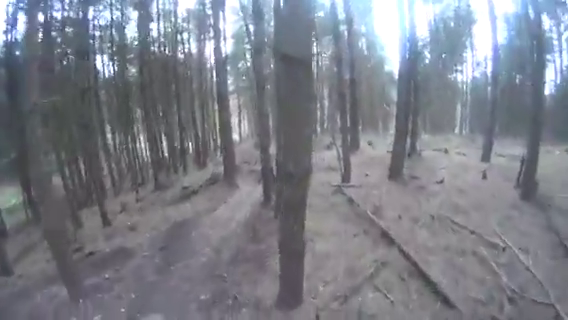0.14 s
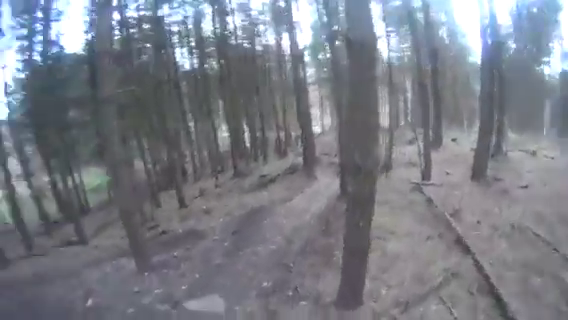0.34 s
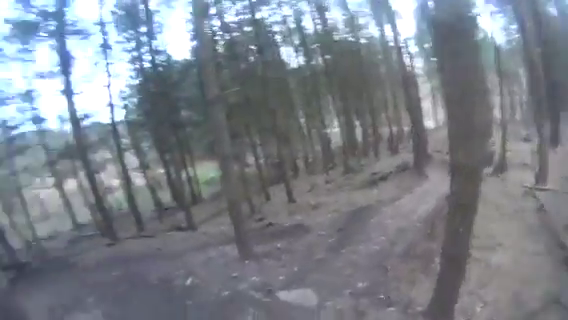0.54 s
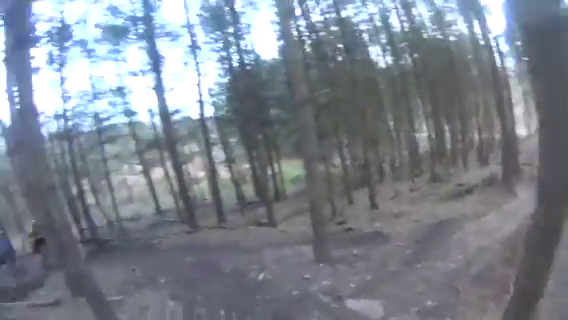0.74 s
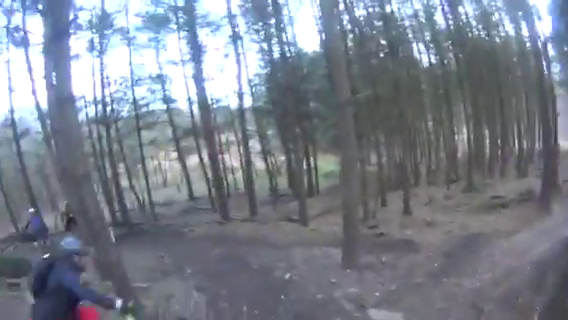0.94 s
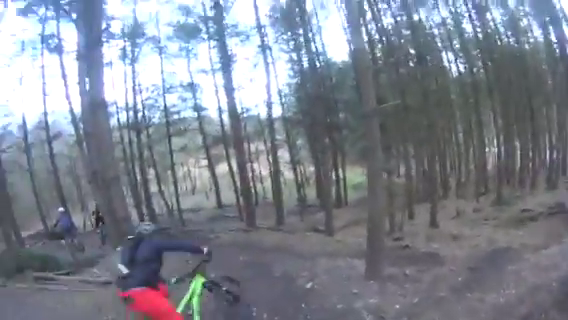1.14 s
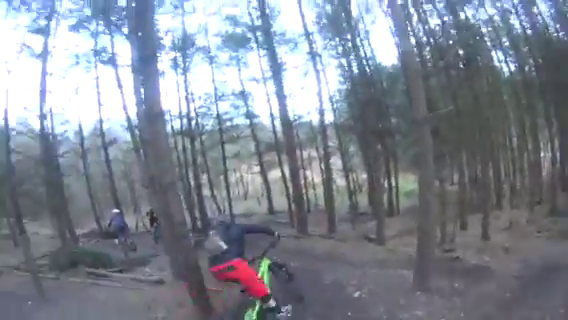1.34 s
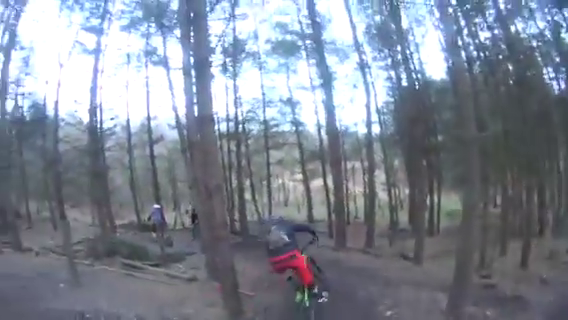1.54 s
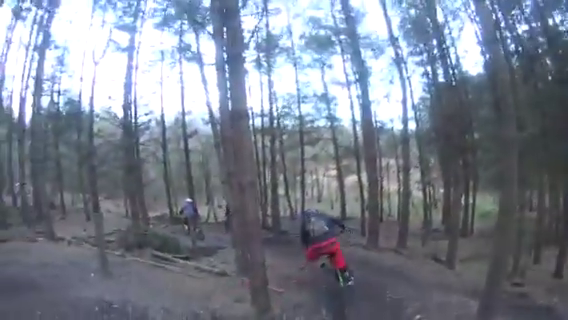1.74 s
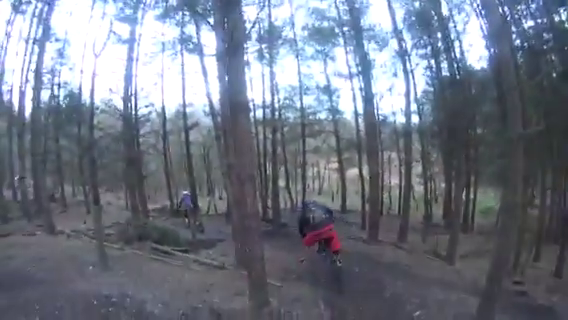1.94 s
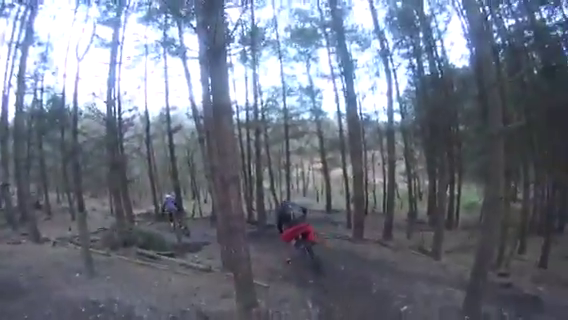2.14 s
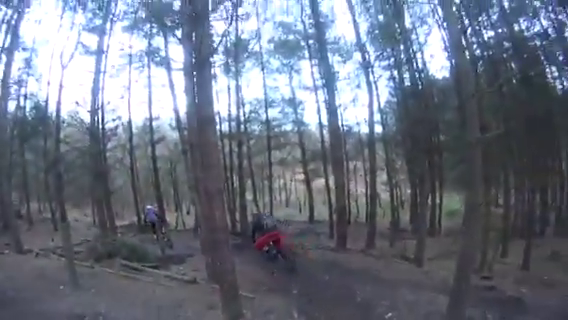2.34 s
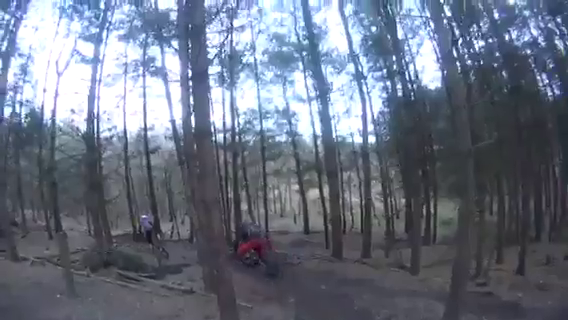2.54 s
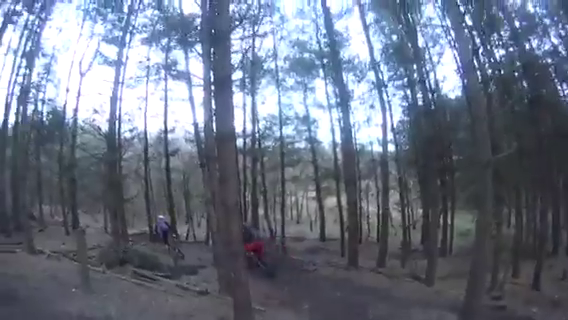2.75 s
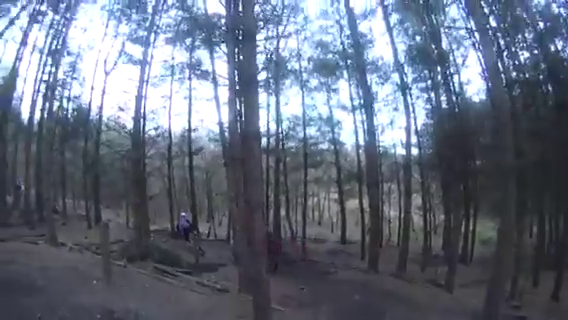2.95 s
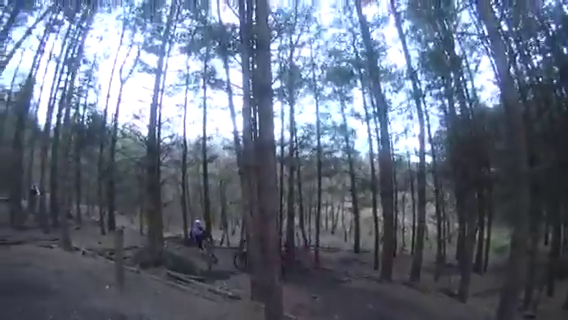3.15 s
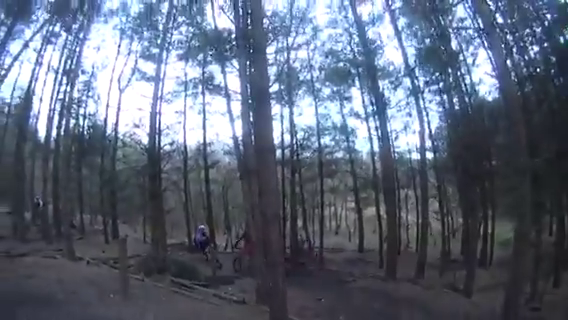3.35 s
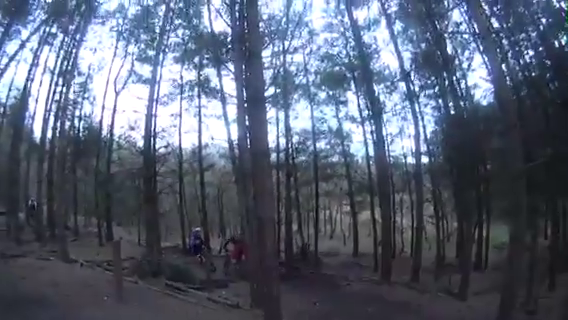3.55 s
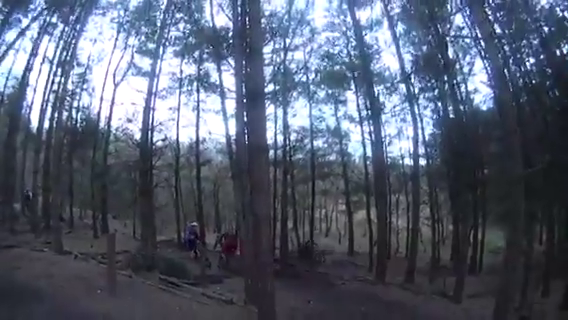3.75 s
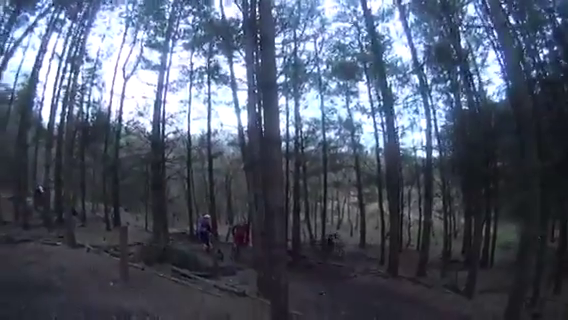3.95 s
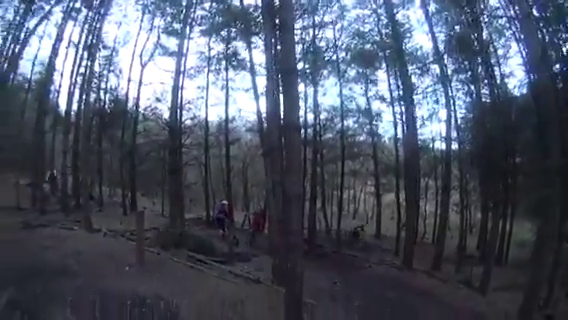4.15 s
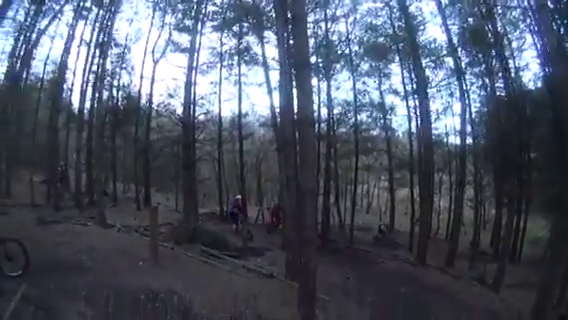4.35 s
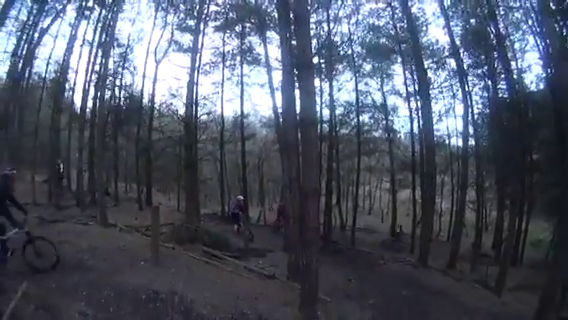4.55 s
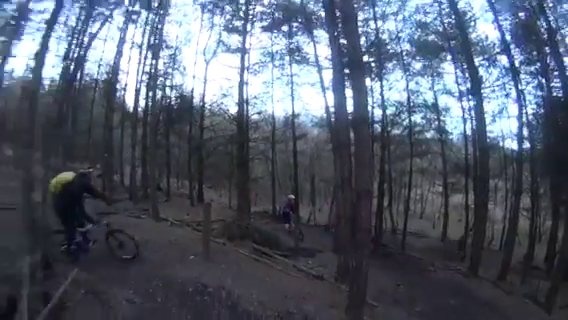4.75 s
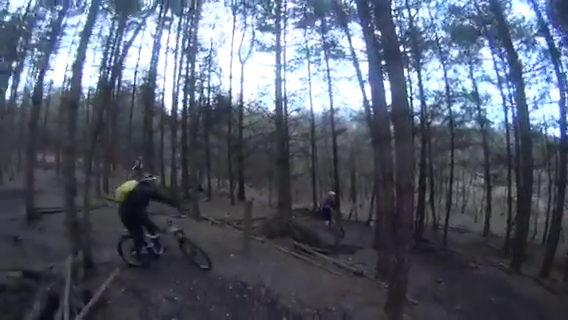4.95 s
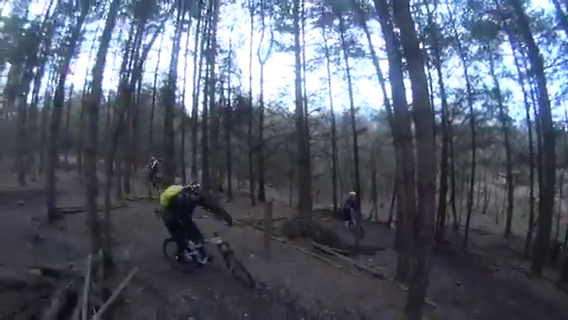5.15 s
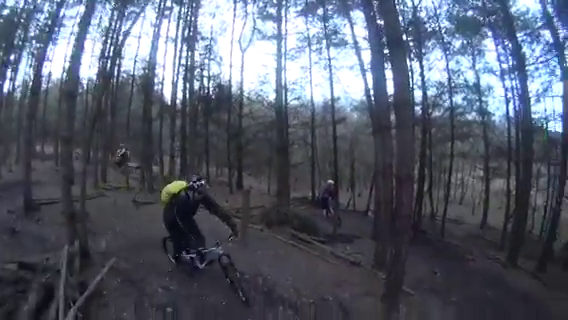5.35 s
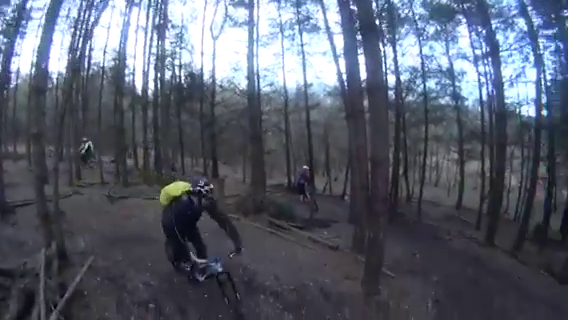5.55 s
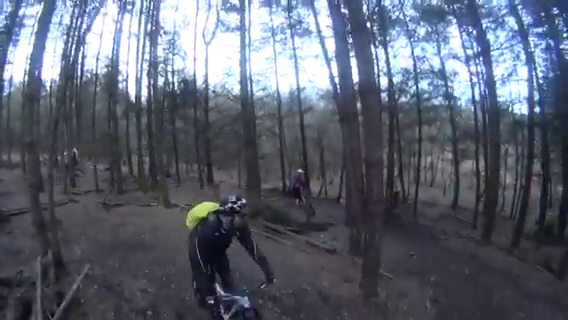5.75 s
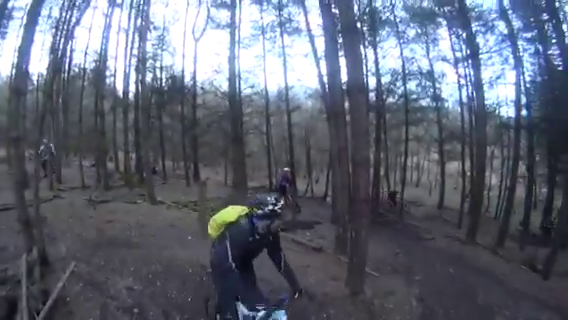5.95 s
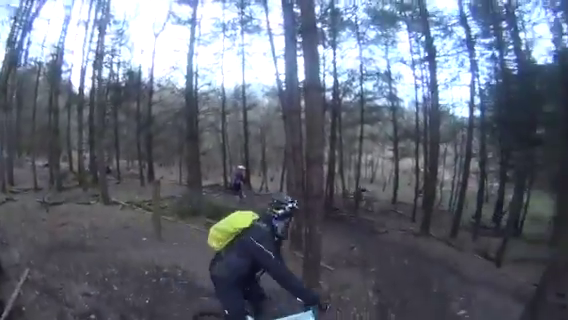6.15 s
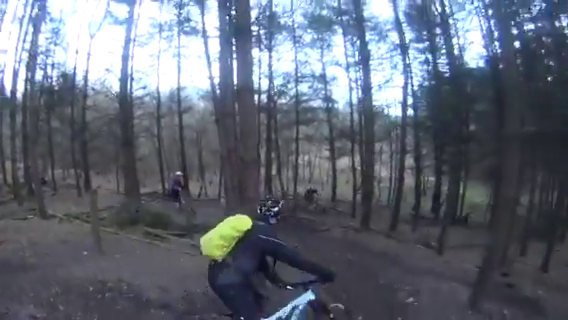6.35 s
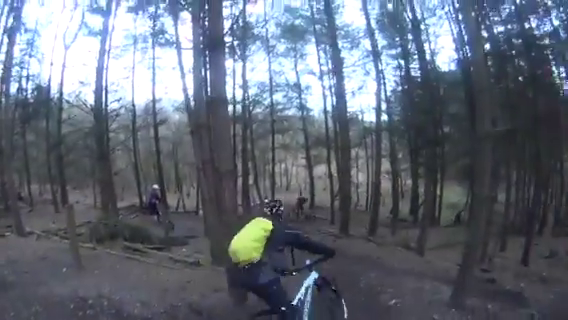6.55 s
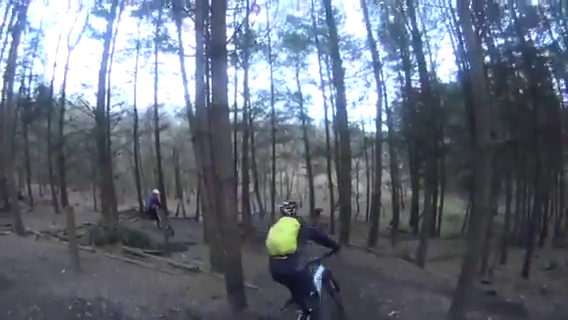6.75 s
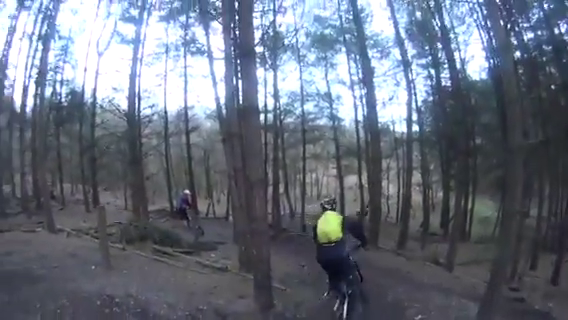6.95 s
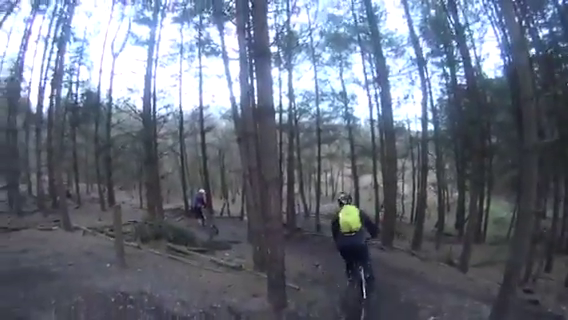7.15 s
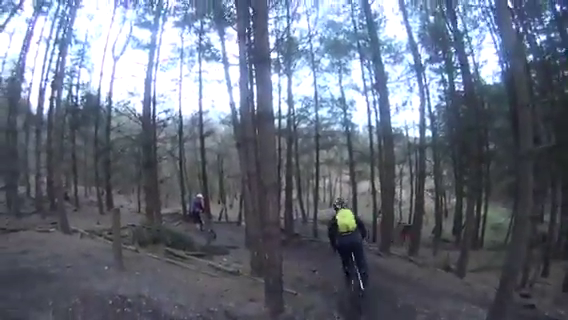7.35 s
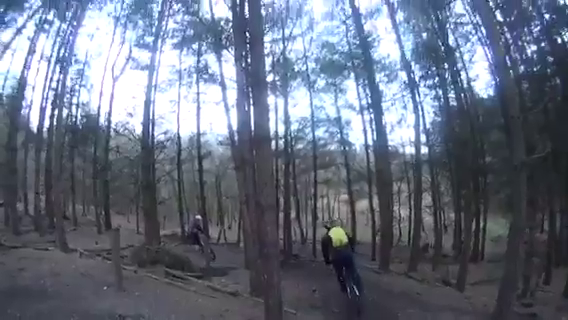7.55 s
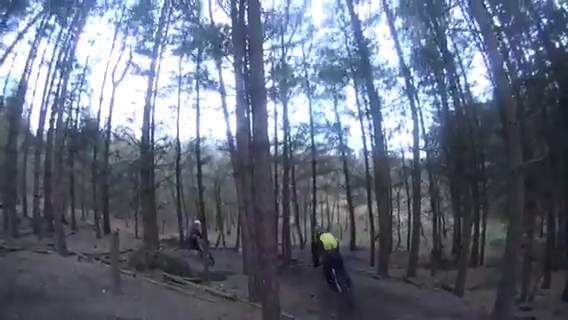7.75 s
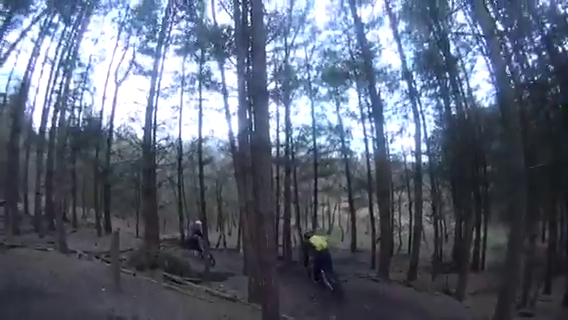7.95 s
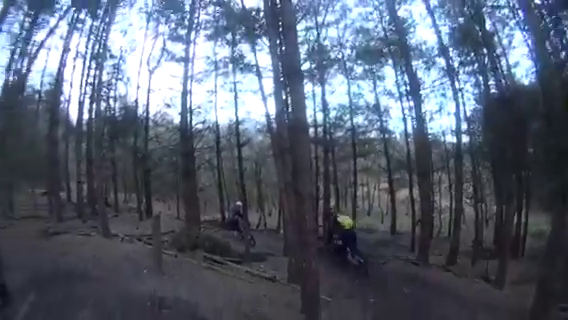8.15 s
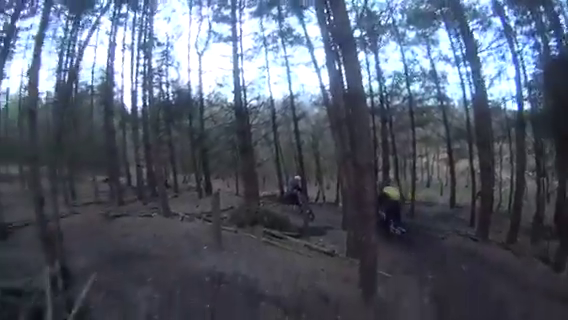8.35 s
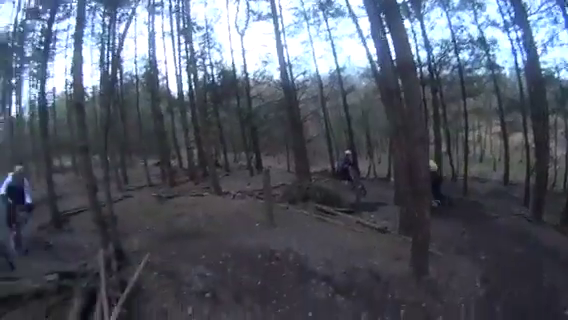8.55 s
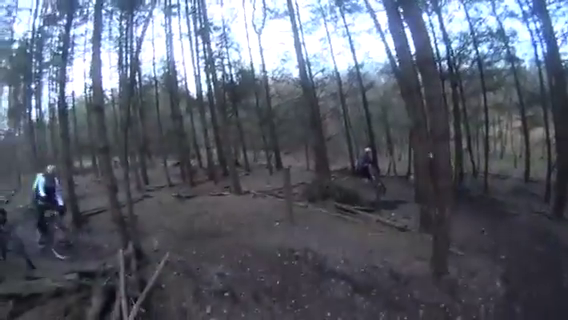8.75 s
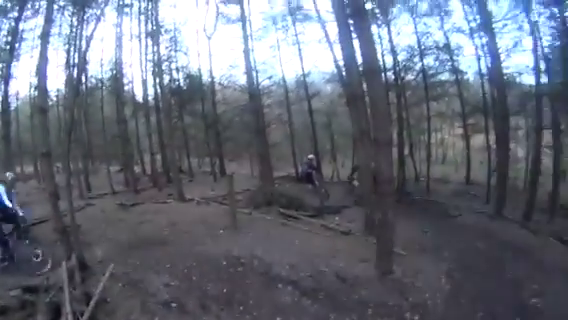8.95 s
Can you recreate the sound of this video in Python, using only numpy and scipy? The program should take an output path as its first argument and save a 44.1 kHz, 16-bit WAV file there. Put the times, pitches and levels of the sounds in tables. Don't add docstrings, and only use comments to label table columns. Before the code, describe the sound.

Close beside a forest dirt trail, an action camera in a closed case catches low wind thumps and gritty tyre rolling. A bike knocks, then skids in rough scraping bursts around one second, and leaves with a hissing, thinly whistling brake rub. A second bike nears with rapid freewheel ticks, loudest near six and a half seconds with chain and crank rattles, then recedes.

```python
import sys
import numpy as np
from scipy import signal
from scipy.fft import rfft, irfft, next_fast_len
from scipy.io import wavfile
from scipy.ndimage import uniform_filter1d

SR = 44100
rng = np.random.default_rng(int(sys.argv[2]) if len(sys.argv) > 2 else 0)


def elevation(decibels):
    levels = np.asarray(decibels, float)
    return 10 ** (levels / 20)


def unload_wav(signal):
    wavfile.write(
        sys.argv[1],
        SR,
        np.round(np.clip(np.atleast_2d(signal).T, -1, 1) * 32767).astype(np.int16),
    )


N = 396459
SIZE = next_fast_len(N + SR // 2)
HZ = np.arange(SIZE // 2 + 1) * SR / SIZE + 1e-3
TIME = np.arange(N) / SR

# frequency in Hz, density in dB per Hz.
SPRAY_DB = [(2240, -19), (3800, 0), (4460, -5), (5070, 1), (5650, -5.5), (6060, -1), (6830, -3),
            (8570, -3.5), (9630, -7.5), (10500, -10.5), (11000, -16), (14300, -55), (22000, -120)]
# frequency in Hz, density in dB per Hz.
SCRAPE_DB = [(180, -33), (300, -20), (698, -23.5), (764, -21), (1020, -13.5), (1100, 1), (1180, -6),
             (1480, 6), (1670, -6), (2510, 0.5), (3010, -2), (3720, -10.5), (5580, -17), (8020, -23),
             (11000, -42), (14300, -71), (22000, -120)]


def columns(table):
    s, *values = np.transpose(table)
    return [np.interp(TIME, s, v) for v in values]


def over_hz(points):
    hz, value = np.transpose(points)
    return np.interp(np.log(HZ), np.log(np.maximum(hz, 20)), value)


def unit(x):
    return x / np.sqrt(np.mean(x ** 2))


def filtered(x, response):
    return irfft(rfft(x, SIZE) * response, SIZE)[..., :N]


def modes(table):
    response = 0
    for k, (hz, width_hz, db) in enumerate(table):
        damping = 1j * HZ * width_hz
        response = response + (-1) ** k * elevation(db) * damping / (hz * hz - HZ ** 2 + damping)
    return response


def walk(rate_hz, slews):
    k = int(SR / rate_hz)
    x = np.repeat(rng.standard_normal(N // k + 1), k)[:N]
    for _ in range(slews):
        x = uniform_filter1d(x, k)
    return unit(x)


def patchy(db):
    gain = elevation(db)
    return gain / np.sqrt(uniform_filter1d(gain ** 2, SR // 12))


def air():
    return rng.standard_normal((3, N))


def gated(tables):
    on = sum((TIME >= t[0][0]) & (TIME < t[-1][0]) for t in tables)
    rows = sum(map(list, tables), [])
    return uniform_filter1d(np.minimum(on, 1.), SR // 25), columns(rows)


def rubbing(hz, width_hz):
    envelope = unit(filtered(air(), np.exp(-(2 * HZ / width_hz) ** 2)))
    return envelope * np.sin(2 * np.pi * np.cumsum(hz) / SR)


def crunch(clump_db, bump_db, crack_db):
    sizes_db = 2.0 * np.minimum(rng.exponential(size=N), 4)
    cracks = unit((rng.random(N) < 900 / SR) * elevation(sizes_db))
    ground_db = clump_db * walk(240, slews=1) + bump_db * walk(24, slews=2)
    return ground_db, 1 + elevation(crack_db) * cracks


def tyres():
    # frequency in Hz, density in dB per Hz.
    tread_colour = [(130, -40.5), (220, -15.5), (464, -14.5), (683, -16), (825, -13), (1050, -1.5),
                    (1150, -0.5), (1330, 2), (1810, -9.5), (2100, -8.5), (2730, -5.5), (4620, -120)]
    # frequency in Hz, density in dB per Hz.
    grit_colour = [(1000, -18), (1700, 2.5), (1830, -22.5), (2330, 1), (2470, 4.5), (2710, 3), (2950, 8.5),
                   (3340, 1), (3800, -6.5), (4600, -1.5), (5980, -12), (10100, -120)]
    # time in seconds, tread level in dB, looseness of the soil in dB.
    rolling = [(0, -38, -11.5), (.5, -41, -11), (.68, -45.5, -2.5), (.82, -39.5, -1.5), (1.1, -35.5, -1),
               (1.4, -42, 5.5), (1.68, -44.5, 0.5), (2.75, -46, 2), (2.95, -48, -1), (3.45, -46.5, -2),
               (4.7, -46, -1), (5.76, -43.5, 0.5), (6.3, -42, -2), (6.85, -42, -3.5), (7.25, -46.5, -2),
               (8.4, -46, -0.5), (8.62, -47, -4), (8.99, -47.5, 1)]
    ground_db, cracks = crunch(clump_db=1.4, bump_db=1.0, crack_db=-11)
    tread_db, loose_db = columns(rolling)
    grit_db = tread_db + 1.5 + 0.588 * loose_db
    spray_db = tread_db + loose_db
    layers = (tread_colour, tread_db, .9), (grit_colour, grit_db, 1.1), (SPRAY_DB, spray_db, .45)
    out = 0
    for colour, db, ground_share in layers:
        force = air() * cracks * patchy(ground_share * ground_db + .7 * walk(8, slews=2))
        out = out + elevation(db) * unit(filtered(force, elevation(over_hz(colour))))
    return out


def skids():
    # start in seconds, length in seconds, scrape level in dB, brightness in dB per octave.
    slides = [(0.636, 0.03, -32, 1.5), (0.666, 0.045, -36, 1), (0.708, 0.022, -31, 6.5),
              (0.723, 0.0244, -24, -0.5), (0.893, 0.037, -23.5, -1.5), (0.915, 0.0348, -20, 3),
              (0.957, 0.02, -21.5, 2), (0.976, 0.0388, -18, 1.5), (1.018, 0.0254, -22.5, 0),
              (1.045, 0.0216, -24, -6.5), (1.096, 0.0308, -29, 7.5), (1.131, 0.069, -39, 13),
              (1.186, 0.0484, -26.5, 1.5), (1.236, 0.0237, -22.5, 8.5), (1.256, 0.068, -35.5, 3),
              (5.776, 0.0414, -34.5, 5), (5.852, 0.0676, -34.5, 8), (6.025, 0.0137, -33, 3),
              (6.052, 0.0154, -37, 0), (6.324, 0.0294, -30.5, -2.5), (6.535, 0.043, -33.5, 8),
              (6.623, 0.0773, -32.5, 7), (7.468, 0.018, -34, 2), (8.318, 0.0914, -39.5, 3)]
    edge_s = 0.0045
    _, cracks = crunch(clump_db=0, bump_db=0, crack_db=-18)
    slips = [patchy(np.clip(5 * walk(rate, slews=1), -14, 2)) for rate in (200, 380)]
    case = elevation(over_hz(SCRAPE_DB))
    carcass, scrape = (unit(filtered(air() * cracks * slip, case)) for slip in slips)
    dull = 1 / (1 + (HZ / 1900) ** 6)
    high = filtered(scrape, 1 / (1 + (4200 / HZ) ** 6))
    power = 0
    for s, length_s, db, tilt_db in slides:
        on = np.clip(np.minimum(TIME - s, s + length_s - TIME) / edge_s + .5, 0, 1)
        power = power + on * elevation(2 * (db + tilt_db * np.array([[-1], [0], [1.2]])))
    gain = np.sqrt(power)
    middle = filtered(scrape, 1 - dull) - high
    return gain[0] * filtered(carcass, dull) + gain[1] * middle + gain[2] * high


def bites():
    # peak time in seconds, peak level in dB, ring frequency in Hz.
    snaps = [(0.8978, -18, 2470), (0.9019, -17, 1425), (0.9104, -17.5, 1510), (0.9149, -14, 1520),
             (0.9194, -16, 1394), (0.9224, -20.5, 2560), (0.9252, -18.5, 2690), (0.9289, -15, 2470),
             (0.934, -13, 2430), (0.9372, -14.5, 2920), (0.9414, -18.5, 2650), (0.9454, -19, 2480),
             (0.951, -14.5, 2630), (0.9549, -12.5, 2520), (0.9602, -13, 2490), (0.964, -16.5, 3010),
             (0.9702, -14, 2500), (0.9778, -20, 1157), (0.9822, -15.5, 2250), (0.9882, -17, 2630),
             (0.9957, -13.5, 3130), (1.001, -14, 2460), (1.0043, -12.5, 1460), (1.0094, -13.5, 1387),
             (1.0129, -19.5, 2680), (1.0183, -14, 1292), (1.02, -18.5, 1490), (1.024, -20.5, 1920),
             (1.03, -21, 1740), (1.032, -17, 1350), (1.0345, -21, 2440), (1.048, -14.5, 2345),
             (1.0511, -14.5, 2090), (1.0544, -13, 1390), (1.0589, -12.5, 2220), (1.0643, -20, 2330),
             (1.2032, -17.5, 1994), (1.2067, -21.5, 1244), (1.2106, -22, 2130), (1.221, -22.5, 2270),
             (1.2252, -18, 2090), (1.2286, -22, 1980), (1.2364, -16, 3165), (1.2422, -19, 4000),
             (1.2454, -23, 3830), (1.2478, -23, 4890), (1.2503, -17.5, 4450), (1.2566, -13.5, 1428),
             (1.2624, -20.5, 1390), (5.799, -22.5, 2655), (5.8677, -27, 3280), (5.8724, -27, 3030),
             (5.8962, -27, 2120), (5.9195, -29, 3010)]
    rise_s, fall_s = .0007, .0014
    t = np.arange(-128, 512) / SR
    shape = np.where(t < 0, np.exp(-(t / rise_s) ** 2), np.exp(-(t / fall_s) ** 1.06))
    ring, grit = np.zeros((2, N))
    for (s, db, hz), turn in zip(snaps, rng.random(len(snaps))):
        at = slice(int(s * SR) - 128, int(s * SR) + 512)
        ring[at] += elevation(db) * shape * np.cos(2 * np.pi * (hz * t + turn))
        grit[at] += elevation(db) * shape
    soft = elevation(over_hz(SPRAY_DB)) / (1 + (HZ / 6500) ** 4)
    knobs = filtered(ring, 1 / (1 + (1000 / HZ) ** 8))
    return knobs + elevation(-14) * filtered(grit * air(), unit(soft))


def disc_hum():
    # time in seconds, level in dB, disc resonance in Hz.
    hums = [
        [(1.75, -56, 2900), (1.95, -46.5, 2950), (2.25, -51.5, 2900), (2.39, -44.5, 2680), (2.55, -46, 2850),
         (2.7, -40, 2880), (2.8, -55, 2950)],
        [(7.7, -62.5, 2950), (7.85, -45.5, 2950), (7.95, -52, 3000)],
    ]
    on, (db, hz) = gated(hums)
    return on * elevation(db + 2.0 * walk(39.95, slews=2)) * rubbing(hz, 620)


def freewheel():
    # frequency in Hz, width in Hz, level in dB.
    hub = [(3275, 490, -0.5), (4360, 815, -4.5), (5056, 247, 1.5), (6236, 1010, -3.5), (7562, 852, 3.5),
           (9110, 1140, -3), (10270, 675, -5)]
    drops, sizes, near = teeth()
    pawl = np.zeros(N)
    pawl[drops] = sizes / near[drops]
    t = np.arange(2048) / SR
    fade = np.exp(-t / .0024) + .4 * np.exp(-t / .006)
    force = signal.fftconvolve(pawl, fade)[:N] * air() + 3.6 * pawl
    behind = np.interp(TIME, (7.58, 7.88), (0, 1))
    ticks = (1 - 0.247 * behind) * filtered(force, modes(hub))
    ticks = ticks + behind * filtered(force, modes([(8150, 426, 2.8)]))
    ticks = ticks / np.sqrt(np.mean(ticks[:, drops.min():drops.max()] ** 2))
    return ticks * near * elevation(1.0)


def teeth():
    # time in seconds, ratchet teeth per second.
    wheel = [(3.9, 58.05), (4.609, 56.92), (4.627, 49.41), (4.88, 66.04), (5.24, 44.12), (5.5, 43),
             (5.55, 58), (5.675, 72.79), (5.903, 65.87), (6.195, 45.62), (6.51, 63.92), (6.608, 57.14),
             (6.703, 43.78), (6.986, 42.4), (7.907, 64.95), (7.964, 61.33), (8.315, 78.67), (8.615, 60.37),
             (8.9, 58.92)]
    # time in seconds, tick level in dB.
    hub_near = [(3.9, -58.5), (4.4, -50.5), (4.6, -60), (4.9, -45.5), (5.6, -43.5), (6.25, -39.5),
                (6.42, -37), (6.8, -40), (7.15, -41), (7.35, -45.5), (8.2, -45.5), (8.9, -56)]
    # time in seconds, peak level in dB.
    nearing = [(4.7902, -31.5), (4.8075, -30), (4.8383, -30.5), (4.8537, -28.5), (4.8697, -35.5),
               (4.9001, -28.5), (4.917, -25.5), (4.933, -32), (4.9489, -26.5), (4.9657, -32),
               (4.9978, -26.5), (5.0318, -29.5), (5.0486, -29), (5.0666, -28.5), (5.1037, -27),
               (5.1239, -28), (5.144, -28), (5.165, -31.5), (5.187, -28), (5.2089, -34.5), (5.2298, -28),
               (5.2512, -25.5), (5.2729, -24.5), (5.2956, -28.5), (5.3206, -24.5), (5.3433, -30),
               (5.3658, -28.5), (5.3898, -26), (5.4135, -28), (5.4382, -24.5), (5.4613, -24.5),
               (5.4842, -25.5), (5.5075, -25), (5.5269, -26.5), (5.545, -25), (5.5615, -27), (5.5788, -28),
               (5.595, -32), (5.612, -29), (5.6274, -26), (5.6592, -27), (5.6738, -30), (5.6876, -25),
               (5.7158, -25), (5.7711, -25.5), (5.7994, -20.5), (5.8301, -23), (5.8589, -24), (5.8934, -23),
               (5.9349, -25.5), (5.9523, -26), (5.9678, -24), (5.9836, -26), (5.9999, -24)]
    # time in seconds, peak level in dB.
    passing = [(6.0162, -24.5), (6.0325, -22), (6.051, -21.5), (6.0894, -23.5), (6.111, -25.5),
               (6.1307, -25), (6.1503, -22), (6.171, -26.5), (6.19, -22), (6.2115, -20), (6.2326, -23),
               (6.253, -21.5), (6.2734, -23), (6.2923, -21.5), (6.3123, -23.5), (6.3315, -20.5),
               (6.35, -20), (6.3697, -20), (6.387, -19), (6.406, -17), (6.4226, -14.5), (6.455, -17),
               (6.4708, -17.5), (6.4876, -20.5), (6.5033, -18), (6.5186, -16.5), (6.5339, -19.5),
               (6.5499, -19.5), (6.5691, -20.5), (6.584, -18.5), (6.602, -20), (6.619, -20.5),
               (6.637, -22.5), (6.6564, -23), (6.6774, -19), (6.6982, -22), (6.7208, -23.5),
               (6.7443, -21.5), (6.769, -22), (6.7908, -24), (6.8141, -25), (6.8383, -21.5),
               (6.8615, -27.5), (6.8828, -22.5), (6.9054, -23.5), (6.9293, -21), (6.9522, -24),
               (6.9775, -20), (7.0012, -24), (7.0253, -22.5), (7.049, -25.5), (7.071, -25.5), (7.0917, -23),
               (7.113, -25), (7.1347, -24.5), (7.1568, -24.5), (7.178, -26), (7.1978, -24), (7.2183, -25),
               (7.2392, -26.5)]
    tooth_over_mean_db = 16.5
    coasting = (TIME > wheel[0][0]) & (TIME < wheel[-1][0])
    count = .34 + np.cumsum(coasting * columns(wheel)[0]) / SR
    near_db = columns(hub_near)[0]
    s, db = np.transpose(list(nearing) + list(passing))
    heard = (s * SR).astype(int)
    free = np.flatnonzero(np.diff(np.floor(count)) > 0)
    free = free[(free < heard[0] - SR // 100) | (free > heard[-1] + SR // 100)]
    missed = []
    for a, b in zip(heard, heard[1:]):
        steps = max(round(count[b] - count[a]), 1)
        missed.append(np.linspace(a, b, steps, endpoint=False)[1:])
    others = np.concatenate([free] + missed).astype(int)
    sizes_db = near_db[others] + 1.49 * rng.standard_normal(len(others))
    return np.r_[heard, others], elevation(np.r_[db - tooth_over_mean_db, sizes_db]), elevation(near_db)


def knocks():
    # time in seconds, peak level in dB, treble in dB.
    frame = [(.0649, -23, -21), (.209, -24, -12.5), (.7262, -13.5, -26), (3.5885, -25.5, -10.5),
             (4.8594, -28, -18), (2.718, -30, -15), (5.144, -30.5, 2.5), (5.685, -30, -25),
             (5.76, -31, -25), (8.4876, -31, -12), (8.8185, -27, -21.5)]
    # time in seconds, peak level in dB, treble in dB.
    crank = [
        (1.0445, -17.5, -30.5),
        (4.5022, -19, -28),
        (6.0545, -23.5, -7),
        (6.329, -19.5, -22.5),
        (6.3475, -14.5, -21.5),
    ]
    # time in seconds, peak level in dB, treble in dB.
    rim = [(.6527, -25, -27), (.7361, -11, -29), (4.519, -29, -19), (4.7092, -21.5, -11.5),
           (4.7398, -23.5, -5), (4.795, -30, -12.5), (5.7967, -32.5, -7.5), (6.4964, -24.5, -5.5),
           (8.8168, -22, -7)]
    # time in seconds, peak level in dB, treble in dB.
    chain = [(1.3023, -20.5, 0), (1.3908, -23, -13.5), (1.482, -24, -9), (1.6856, -29, -6),
             (2.098, -30.5, -12.5), (3.6401, -33.5, 2), (3.7118, -26.5, -23), (4.5483, -29, -9.5),
             (4.626, -34.5, -15.5), (5.037, -27.5, -11.5), (5.7199, -24, -16), (5.8661, -26.5, -8),
             (5.894, -28, -3), (6.0242, -19, -14), (6.3974, -28.5, -2), (6.4223, -29, 6),
             (6.55, -18.5, -12), (6.594, -21.5, -1.5), (6.6398, -20, -17), (6.6794, -27, -5.5),
             (6.744, -30, -10), (6.793, -26, -8), (6.8174, -27.5, -15.5), (6.8379, -28, -10),
             (6.9212, -21, -11.5), (7.2774, -29, -6), (7.4723, -22.5, -9.5)]
    split_hz = 1900
    t = np.arange(4096) / SR
    ring, dull, crisp, bright = np.zeros((4, N + len(t)))
    parts = (frame, 1380), (crank, 2200), (rim, 2658), (chain, 3066)
    for s, db, treble_db, hz in [(*row, hz) for rows, hz in parts for row in rows]:
        hz = hz * (1 + .03 * rng.standard_normal())
        at = slice(int(s * SR), int(s * SR) + len(t))
        fade = elevation(db) * np.minimum(t / .0007, 1)
        ring[at] += fade * np.sin(2 * np.pi * hz * t) * np.exp(-t / .0016)
        crackle = dull if hz < split_hz else crisp
        crackle[at] += fade * (np.exp(-t / 0.0032) + 0.283 * np.exp(-t / 0.0398))
        bright[at] += fade * elevation(treble_db) * np.exp(-t / 0.0034)
    case = elevation(over_hz(SCRAPE_DB))
    light = case * np.sqrt(HZ) / (1 + (split_hz / HZ) ** 4)
    rattle = filtered(dull[:N] * air(), unit(case)) + filtered(crisp[:N] * air(), unit(light))
    snap = filtered(bright[:N] * air(), unit(elevation(over_hz(SPRAY_DB))))
    body = filtered(ring[:N], 1 / (1 + (950 / HZ) ** 8))
    return elevation(2) * body + elevation(-9) * rattle + elevation(-2) * snap


def brake():
    # time in seconds, level in dB, upper disc resonance in Hz.
    rubs = [
        [(1.08, -37.5, 8300), (1.3, -39, 8683), (1.7, -43.5, 8580), (1.85, -45.5, 8000), (2.3, -50, 8090),
         (2.42, -45, 8150), (2.58, -46, 8600), (2.75, -45, 8850), (2.96, -45, 8900)],
        [(3.46, -57, 8480), (3.54, -50, 8480), (3.65, -47.5, 8420), (3.97, -56, 8400)],
    ]
    on, (db, high_hz) = gated(rubs)
    low_hz = .6 * high_hz
    out = elevation(-4) * rubbing(low_hz, 900) + elevation(-1) * rubbing(high_hz, 2300)
    out = out + elevation(-6) * rubbing(10301 + 0 * db, 1300)
    whistle = np.interp(TIME, (2.3, 2.45, 2.95, 3.0), (0, 1, 1, 0))
    for hz in low_hz, high_hz:
        out = out + whistle * elevation(-8 + 2.5 * walk(12, slews=2)) * rubbing(hz, 280)
    return on * elevation(db + 1.2 * walk(9, slews=2)) * out


def wind():
    # frequency in Hz, density in dB per Hz.
    buffeting = [(8.8, -30), (15, 11.5), (32, 1), (81, -5), (108, -2.5), (130, 0), (170, -40), (290, -120)]
    # frequency in Hz, width in Hz, level in dB.
    cavity = [(158.5, 56.9, 0.5), (114.04, 56.6, -5), (686.8, 250, -7), (391.3, 216, -10.5)]
    # peak time in seconds, hum level in dB, rise and fall in seconds for each 10 dB.
    gusts = [(.06, -41.5, 0.046, 0.215), (.37, -31.5, 0.0536, 0.0815), (.55, -42, 0.089, 0.43),
             (.84, -40, 0.064, 0.0645), (1.18, -38.5, 0.047, 0.01), (1.74, -47.5, 0.073, 0.18),
             (2.27, -49.5, 0.163, 0.29), (3.22, -45, 0.117, 0.01), (3.68, -47, 0.187, 0.23),
             (4.8, -45, 0.17, 0.21), (5.13, -38.5, 0.11, 0.0589), (6.25, -42.5, 0.125, 0.3744),
             (6.66, -45.5, 0.089, 0.02), (8.25, -43, 0.19, 0.2758), (8.99, -45.5, 0.098, 0.04)]
    # time in seconds, buffeting level in dB.
    lull = [(0, -47), (1.2, -51.5), (2.1, -52.5), (3, -58.5), (4.4, -59.5), (5.6, -55), (8.99, -58.5)]
    # middle in seconds, peak level in dB, half length in seconds.
    puffs = [(.377, -24, 0.011), (.52, -32, 0.0112), (.87, -34, 0.0093), (1.74, -39, 0.0114),
             (3.205, -35, 0.0031), (3.235, -33, 0.0055), (3.69, -44, 0.013), (5.045, -38.5, 0.0144),
             (5.125, -31, 0.0193), (6.31, -33.5, 0.0055), (6.67, -39, 0.0058), (8.22, -38.5, 0.0115)]
    # time in seconds, peak level in dB, push 1 or pull -1.
    slaps = [
        (0.249, -26, -1),
        (0.97, -32, -1),
        (1.119, -27, 1),
        (1.159, -29, -1),
        (1.815, -39, -1),
        (1.855, -39, 1),
        (1.945, -38, -1),
    ]
    breeze = elevation(columns(lull)[0])
    power = 0
    for s, db, rise_s, fall_s in gusts:
        power = power + elevation(db - 10 * np.maximum((s - TIME) / rise_s, (TIME - s) / fall_s)) ** 2
    gust = np.sqrt(power)
    eddies = air() * patchy(3.5 * walk(30, slews=2))
    hum = unit(filtered(eddies, sum(modes([m]) ** 2 for m in cavity)))
    pushes = air() * patchy(3.1 * walk(14, slews=2))
    buffet = unit(filtered(pushes, elevation(over_hz(buffeting))))
    out = np.hypot(gust, elevation(-4.5) * breeze) * hum + np.hypot(elevation(-6.5) * gust, breeze) * buffet
    for s, db, half_s in puffs:
        lower = np.cos(2 * np.pi * cavity[0][0] * (TIME - s))
        upper = np.cos(2 * np.pi * cavity[2][0] * (TIME - s))
        out = out + elevation(db) * np.exp(-((TIME - s) / half_s) ** 2 / 2) * (lower + elevation(-19) * upper)
    for s, db, way in slaps:
        x = (TIME - s - .011) / .0042
        out = out + way * elevation(db) * (1 - 0.5 * x ** 2) * np.exp(-x ** 2 / 2)
    return out


def mottled(x):
    spectrum, out = rfft(x, SIZE), 0
    place = 2 * np.log2(np.clip(HZ, 700, 11200) / 700)
    for band in range(9):
        gain = elevation(1.0 * walk(7, slews=2))
        weight = np.maximum(1 - abs(place - band), 0)
        out = out + gain * irfft(spectrum * weight, SIZE)[:, :N]
    return out


def scene():
    # frequency in Hz, left lead in radians.
    lead_rad = [(20, .15), (90, .45), (130, .8), (220, .85), (350, 1.8), (800, 1.9), (1500, 1.5),
                (2300, 1.2), (2700, .3), (2900, 1.3), (5000, .6), (11000, .4)]
    # frequency in Hz, left minus right in dB.
    balance_db = [(200, 0), (400, 1), (750, 2), (870, 0), (1050, 3), (1750, 1), (2400, 4.5), (2800, -4),
                  (3600, 3), (7000, 1), (11000, 2)]
    # frequency in Hz, level in dB.
    loose_db = [(30, -15), (200, -16), (330, -4), (680, -10), (870, -3), (1100, -14), (1500, -16),
                (1800, -9), (2300, -13), (2750, -1), (3100, -13), (5000, -10), (5600, -6), (6200, -9),
                (11000, -8)]
    # time in seconds, extra left minus right in dB.
    crossing = [(0, -0.17), (.75, 1.22), (1.75, -0.95), (2.5, -0.24), (4.5, 0.58), (6.2, -0.05),
                (7.3, -1.1), (8.2, -1.08), (8.99, 0)]
    sound = mottled(tyres() + brake() + disc_hum()) + skids() + bites() + knocks() + freewheel() + wind()
    side = np.array([[1], [-1]])
    lead = over_hz(lead_rad) / 2
    loose = elevation(over_hz(loose_db))
    port = elevation(side * over_hz(balance_db) / 2) / np.sqrt(np.cos(lead) ** 2 + loose ** 2 / 2)
    shared = filtered(sound[0], port * np.exp(1j * side * lead))
    both = shared + filtered(sound[1:], port * loose)
    return both * elevation(side * columns(crossing)[0] / 2)


def band_limit(x):
    return signal.sosfilt(signal.butter(12, 12280, fs=SR, output="sos"), x)


def record(dry):
    ceiling = .68
    dry = ceiling * np.tanh(dry / ceiling)
    top = elevation(over_hz([(11000, 0), (11120, -24), (11500, -44), (12250, -56), (12400, -90)]))
    treble = filtered(dry, 1 / (1 + (8000 / HZ) ** 8))
    quick, slow = (uniform_filter1d(treble[0] ** 2, size) for size in (64, 2048))
    slow = 3 * slow + elevation(2 * -35)
    clicks = treble * np.clip(quick / slow - 1, 0, 1)
    leak_db = over_hz([(10900, -60), (11100, 0), (12270, -3), (12400, -60)]) - 4
    leak = filtered(clicks, elevation(leak_db)) * elevation(np.array([[2], [-7]]))
    return band_limit(filtered(dry, top) + leak)


dry = scene()
out = record(dry)
unload_wav(out)
```